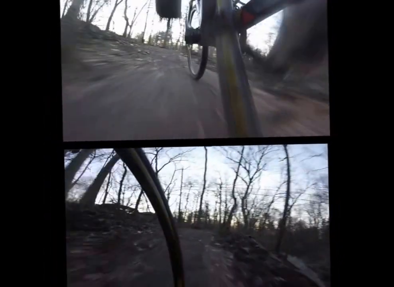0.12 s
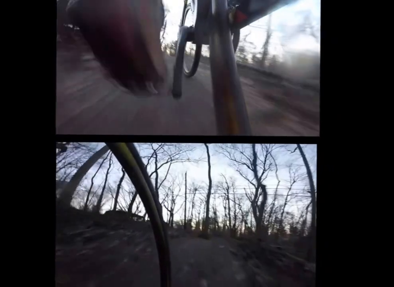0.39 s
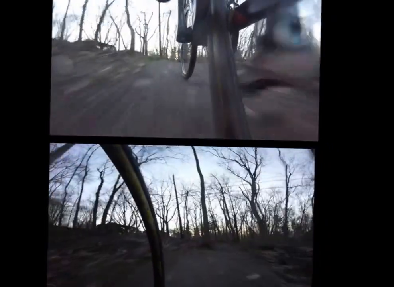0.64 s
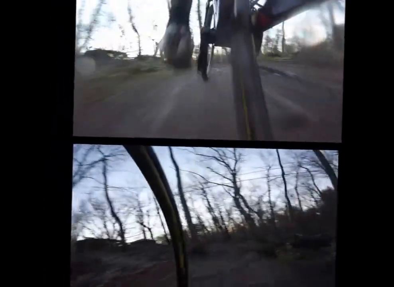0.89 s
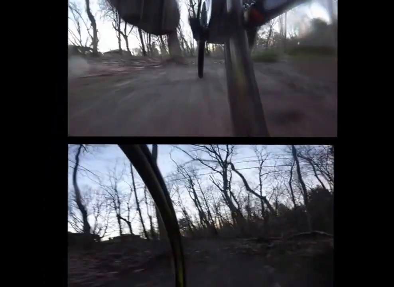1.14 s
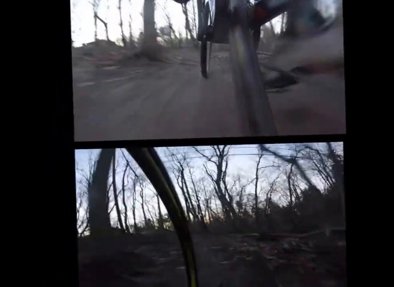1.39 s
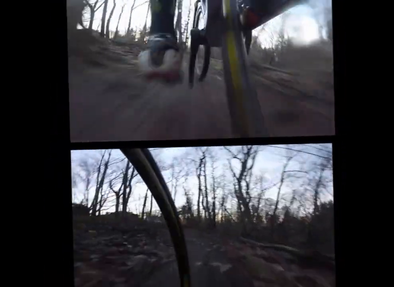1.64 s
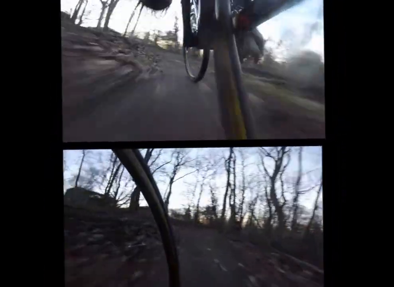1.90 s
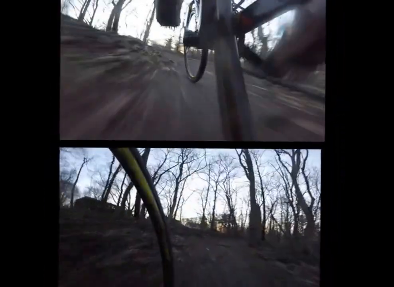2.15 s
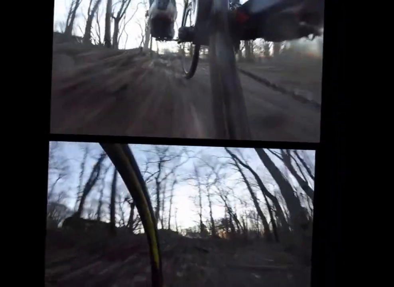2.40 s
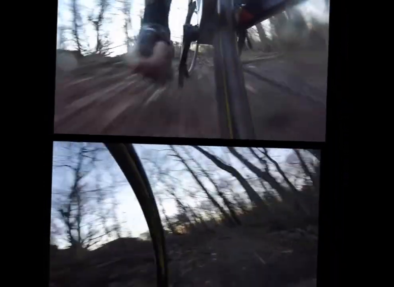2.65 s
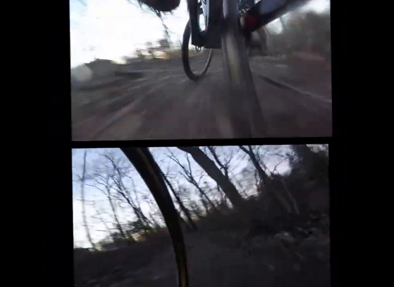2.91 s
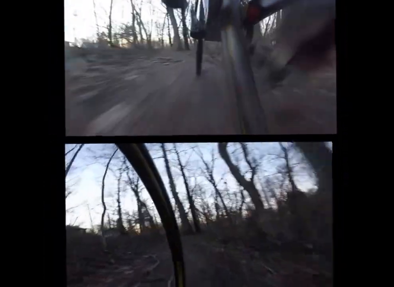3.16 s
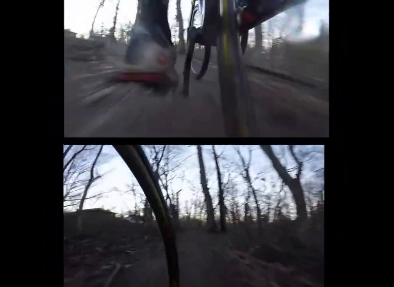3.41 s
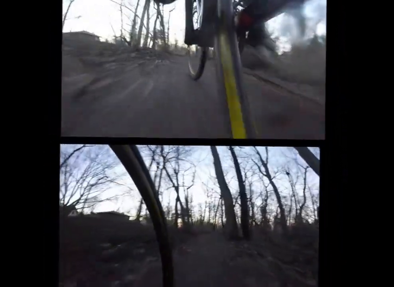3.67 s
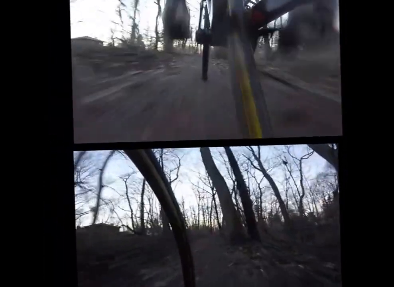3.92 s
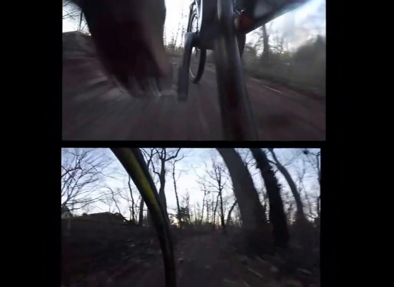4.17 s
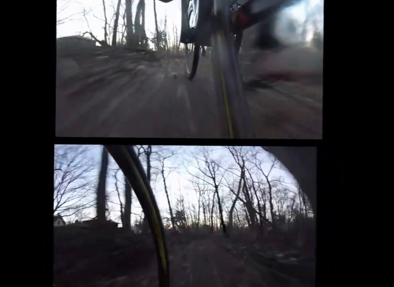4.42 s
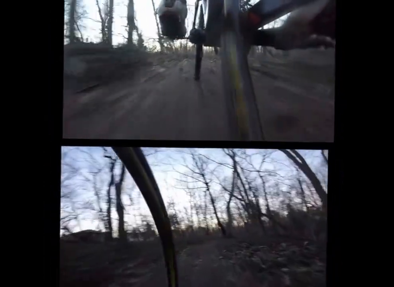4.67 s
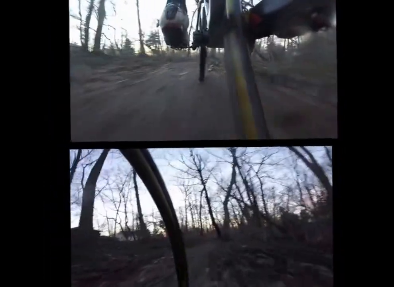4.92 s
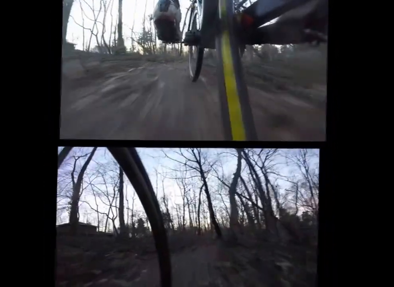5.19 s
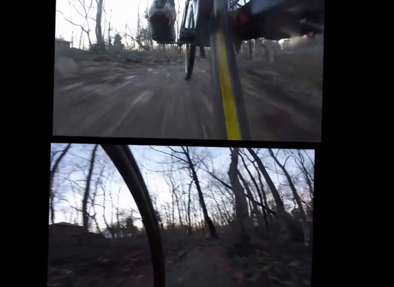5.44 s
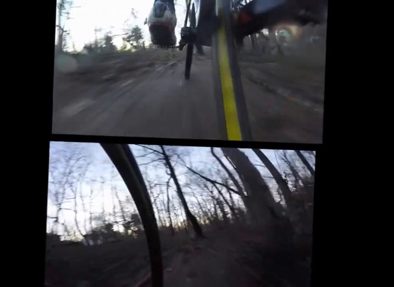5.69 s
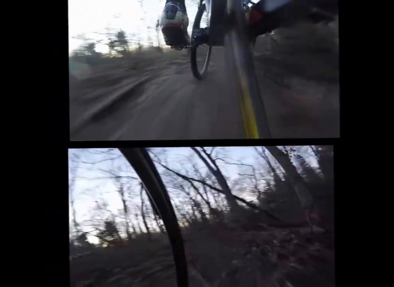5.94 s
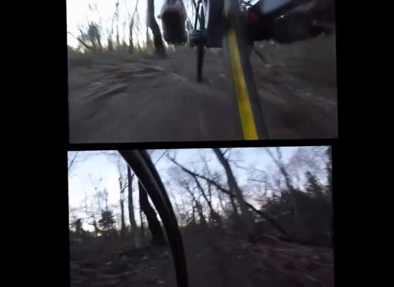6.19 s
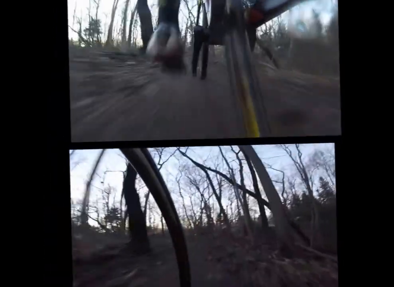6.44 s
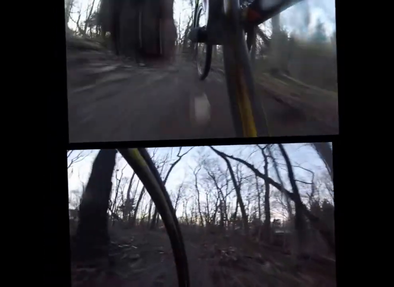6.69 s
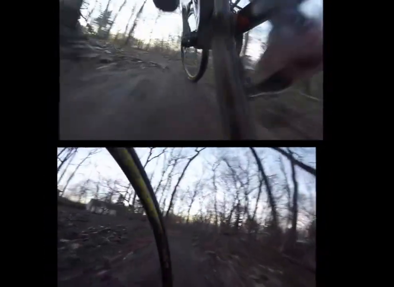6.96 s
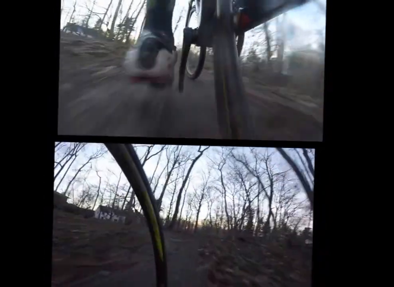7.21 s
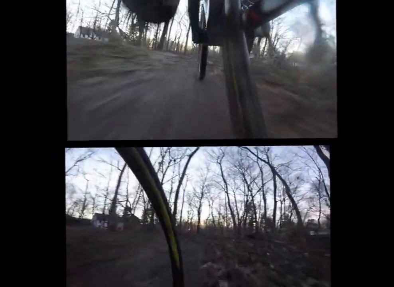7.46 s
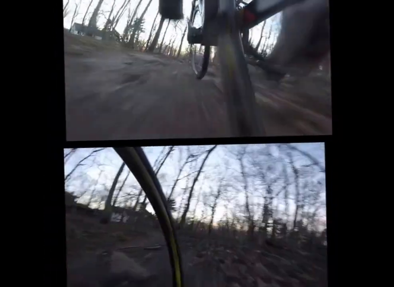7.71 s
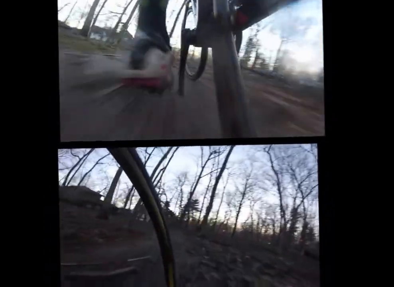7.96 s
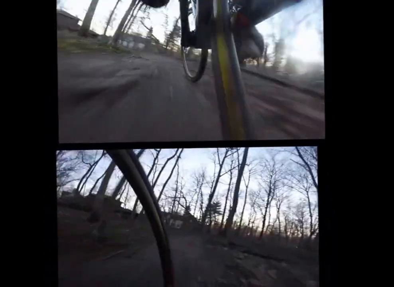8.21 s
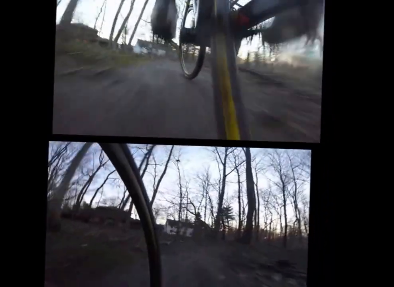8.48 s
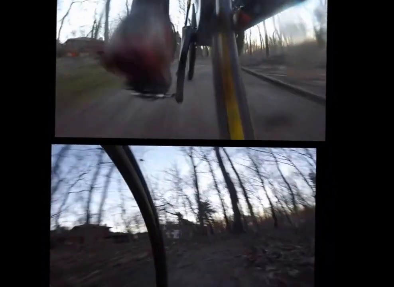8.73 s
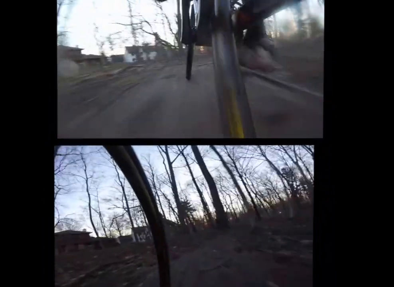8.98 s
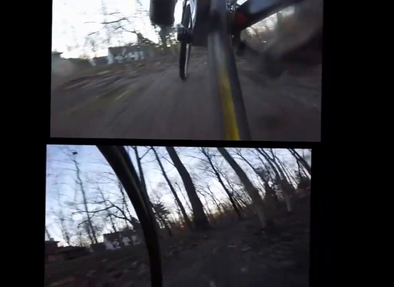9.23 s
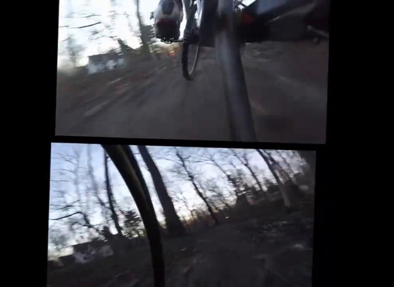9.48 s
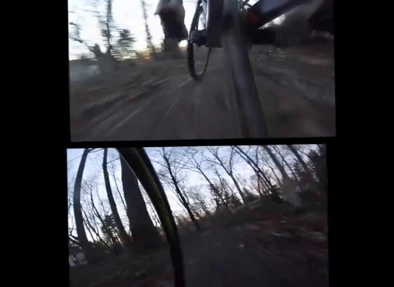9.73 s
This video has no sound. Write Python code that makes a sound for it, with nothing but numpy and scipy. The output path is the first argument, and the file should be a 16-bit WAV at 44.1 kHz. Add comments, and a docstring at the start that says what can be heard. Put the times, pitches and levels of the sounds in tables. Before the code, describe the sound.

A bicycle rides quickly on a woodland dirt trail, heard from a small cased microphone on the frame. Throughout, bass wind buffeting swells and drops, the frame rumbles in irregular jolts, and dirt crunches under the tyres. From 0 to 2.1 s a light gritty chain whirr accompanies knocks, with a bump at the start and a click at 1.8. The freewheel buzzes briefly from 2.1 to 2.5; a cluster of snaps follows, with a strong crack at 2.84 as pedalling resumes. Jolts thud around 3.2-3.6. From 4.5 to 6.3 it coasts with rapid metallic ticking, a barely audible brake squeak near 5.5, snaps around 5.9 and a click at 6.06. The sharpest crack and stone pings come at 6.38. Faint chain noise returns until 9.17, with dense knocks around 7.3-7.9. A heavy jolt at 9.2 begins the final coast, its ticking mixed with crackling snaps and bumps until about 9.9.

```python
"""Bicycle on a woodland trail

Heard from a small camera in a case clamped to the frame: buffeting air and ground jolts fill the bass.
Coloured noise makes the air, and showers of tiny impacts make the frame rumble and tyre crunch.
The chain is gated impact noise, one swell per link; the freewheel is a run of ticks ringing hub modes.
Noise bursts make snaps, knocks and pops; decaying sines make pings; one wavering tone is a brake squeak."""
import sys
import numpy as np
from scipy import signal
from scipy.fft import rfft, irfft
from scipy.io import wavfile
from scipy.ndimage import uniform_filter1d

SR = 44100
rng = np.random.default_rng(int(sys.argv[2]) if len(sys.argv) > 2 else 0)


def invert_db(level):
    """Linear amplitude ratio for a level in decibels (20 dB per decade), elementwise."""
    return 10 ** (np.asarray(level, dtype=float) / 20)


def transcribe(u):
    """Save the signal u as a 16-bit wav file named by the first command-line argument.

    u: samples, shape (n,) or (channels, n), limited to [-1, 1]; the rate is SR.
    q: integer samples, one column per channel.
    """
    v = np.clip(np.atleast_2d(u).T, -1, 1)
    q = np.round(v * 32767).astype(np.int16)
    wavfile.write(sys.argv[1], SR, q)


N = 434826
T = np.arange(N) / SR

# The ride as it unfolds, rumble and crunch being those between bumps:
# t/s, buffeting level/dB, frame rumble level/dB, tyre crunch level/dB
RIDE_LEVELS = [(0.0, -33, -30, -34.5), (0.22, -18.5, -20.5, -31), (0.24, -26, -23, -32.5),
               (0.44, -24.5, -28.5, -38), (0.52, -33.5, -27, -30), (0.6, -27.5, -27, -42),
               (0.69, -30.5, -28.5, -33), (1.18, -25.5, -27, -35.5), (1.56, -28.5, -23.5, -31),
               (1.64, -20, -23, -32.5), (2.06, -29, -22.5, -31), (2.22, -25.5, -26.5, -34.5),
               (2.47, -25, -28, -35.5), (2.94, -24.5, -21.5, -35.5), (3.07, -37, -28, -39.5),
               (3.35, -27.5, -23.5, -33.5), (3.79, -27, -25.5, -33), (4.06, -24.5, -25, -32.5),
               (4.34, -33, -27, -35.5), (5.11, -24.5, -26, -34), (5.16, -36, -25.5, -34),
               (5.32, -21.5, -37, -40.5), (5.43, -26.5, -27, -36), (6.12, -25.5, -25, -36.5),
               (6.34, -33, -26.5, -35), (6.76, -33, -28.5, -37), (7.69, -26.5, -21, -32),
               (7.8, -21.5, -27, -33), (7.96, -29.5, -26.5, -36.5), (8.02, -22, -27.5, -36.5),
               (8.32, -37.5, -27, -35.5), (8.81, -22, -26.5, -33), (8.87, -28.5, -24.5, -36),
               (9.42, -21, -23.5, -32), (9.83, -24, -34.5, -37.5), (9.86, -32, -24, -38)]
# Bumps in the trail that shake the frame: start t/s, length/s, rumble level/dB
TRAIL_BUMPS = [(0.162, 0.091, -22), (0.283, 0.036, -22), (0.343, 0.019, -29), (0.418, 0.031, -22),
               (0.547, 0.075, -21.5), (1.062, 0.054, -23), (1.574, 0.2, -24), (2.12, .06, -20),
               (2.194, 0.031, -19.5), (2.72, 0.094, -24.5), (2.89, 0.087, -31), (3.195, 0.13, -19),
               (3.447, 0.038, -18), (3.546, 0.06, -21.5), (3.904, 0.068, -23.5), (4.569, 0.1, -24),
               (4.924, 0.08, -23), (5.282, 0.071, -19), (6.031, 0.032, -20), (6.1, 0.064, -18),
               (6.43, 0.095, -24.5), (7.576, 0.15, -22.5), (7.756, 0.066, -18.5), (8.007, 0.039, -19),
               (8.105, 0.026, -18), (8.763, 0.1, -19.5), (8.993, 0.058, -20), (9.217, 0.021, -13.5),
               (9.377, 0.197, -20.5), (9.616, 0.029, -23.5), (9.733, 0.099, -22.5)]
# Spectrum of the buffeting air: f/Hz, level/dB per Hz
AIR_COLOUR = [(12, -21), (24, -5), (38, 2), (50, 0), (75, -5), (110, -11.5), (250, -47)]
# Spectrum of the shaken frame: f/Hz, level/dB per Hz
FRAME_COLOUR = [(30, -21.5), (70, -1.5), (125, 0), (190, 1), (290, -2.5), (400, -9.5), (600, -16.5),
                (1200, -49.5)]
# Spectrum of dirt under the tyres: f/Hz, level/dB per Hz
TYRE_COLOUR = [(200, -20), (400, 0), (560, -5), (680, -5), (850, -13), (1080, -17), (1340, -27),
               (1900, -33), (2600, -34), (3800, -46), (6000, -58), (9000, -62)]
# Hairline clicks through the mount: t/s, relative level/dB, tilt from bass to treble/dB
MOUNT_POPS = [(0.435, -32, 11), (0.556, -28, 5), (1.821, -12.5, -7), (3.9146, -13.5, -9),
              (4.1522, -12.5, -7), (4.191, -35, 6), (4.818, -22, 28), (6.057, -7.5, -1), (7.435, -28, -9),
              (8.932, -13, -5), (9.001, -18, -6), (9.021, -20.5, -7), (9.251, -19, -12)]
# Overall colour of those clicks: f/Hz, gain/dB
POP_COLOUR = [(300, -1.5), (8000, -4.5), (9500, -11.5), (10500, -25), (12500, -36), (20000, -73.5)]
# Small stones off spokes and tubes: t/s, relative level/dB, nominal f/Hz, t60/s
STONE_PINGS = [(0.6454, -24, 4180, 0.016), (1.152, -34, 6500, .03), (2.636, -31.5, 4400, 0.023),
               (2.7985, -34, 4260, 0.018), (3.5495, -26, 3340, 0.035), (4.069, -33.5, 4560, 0.033),
               (4.2672, -33, 4100, 0.022), (4.2837, -39, 4370, 0.036), (4.754, -31, 5500, 0.033),
               (6.255, -26, 1780, 0.014), (6.333, -42, 4900, 0.0087), (6.374, -22.5, 3230, 0.023),
               (6.425, -40, 7960, .02), (6.494, -48, 7900, .025), (6.626, -38, 5040, .02),
               (6.835, -35, 4700, 0.014), (7.758, -33, 4500, 0.023), (7.769, -27, 4320, .025),
               (7.877, -35, 3880, 0.062), (8.8423, -26, 4800, 0.011)]
# Brake squeak, before its waver: t/s, f/Hz, level/dB
SQUEAK_PATH = [(5.418, 632, -72), (5.434, 640, -53), (5.486, 661, -49), (5.518, 666, -54), (5.55, 669, -61),
               (5.62, 669, -68)]
# Partials of the squeak: multiple of the pitch, level/dB
SQUEAK_PARTIALS = [(1, 3), (2, 3), (4, -12)]
# Grit and twigs on the case, slack taken up in the drive:
# t/s, relative level/dB, share of metal ring (0-1), decay time of the dry tail/ms
SNAP_EVENTS = [(1.155, -29, 0.24, 4), (2.636, -27, 0.2, 3), (2.658, -37, 0.2, 3), (1.808, -23, 0.3, 1.5),
               (2.517, -27, 0.1, 2.7), (2.54, -20, 0.15, 3), (2.554, -22.5, 0.44, 4.4),
               (2.5866, -36, 0.3, 2.7), (2.604, -22, 0, 5.1), (2.616, -21, 0.1, 4), (2.836, -14, 0, 2.1),
               (2.84, -6, 0.01, 1.1), (2.843, -8, 0.03, 0.72), (3.175, -28, 0.26, 2.3),
               (3.547, -12.5, 0.08, 4.1), (4.145, -27, 0, 1.6), (4.818, -21, 0, 1.4),
               (5.848, -18, 0.05, 1.6), (5.864, -17.5, 0, 1.8), (5.8997, -18.5, 0, 2.7),
               (5.935, -17.5, 0, 2.2), (6.139, -19, 0.07, 3.1), (6.221, -19, 0.4, 3.7),
               (6.253, -22, 0.1, 1.7), (6.357, -33, 0.3, 3), (6.364, -29, 0.7, 4), (6.373, -23, 0.5, 5.8),
               (6.3833, -1.5, 0.34, 1.2), (6.384, -8, 0.3, 4.5), (6.425, -33, 0.15, 2.6),
               (6.464, -35, 0.2, 3), (7.752, -27, 0.4, 5), (7.876, -33, 0.1, 4), (8.312, -25, 0.04, 0.76),
               (8.489, -24, 0.25, 2.4), (8.93, -18, 0, 1.7), (9.458, -21, 0.02, 2.7),
               (9.474, -19.5, 0.1, 3), (9.499, -24, 0, 3), (9.512, -20, 0.1, 3.6), (9.538, -19, 0.1, 3),
               (9.552, -21, 0, 3.5), (9.579, -18.5, 0.02, 3.4), (9.722, -22, 0, 4)]
# Ringing modes of the drive train: f/Hz, level/dB, t60/s
DRIVE_MODES = [(2375, 0, .03), (2600, -4, .012), (2850, -3, .036), (3250, -6, .012), (4300, -8, .01)]
# Roots and stones under the wheels: t/s, relative level/dB, brightness of the upper modes/dB
WHEEL_KNOCKS = [(0.099, -27, -13), (0.276, -23, -25), (0.36, -13, -12), (0.598, -26, -23),
                (1.054, -20, -24), (1.129, -20, -12), (1.189, -21, -27), (1.634, -22, -20),
                (1.785, -22, -19), (2.184, -28, -20), (2.513, -29, -14), (2.553, -16.5, -17),
                (2.899, -26, -21), (3.263, -17.5, -20), (3.289, -23, -22), (3.443, -27, -18),
                (3.546, -18.5, 1), (3.552, -21, -18), (3.615, -20, -23), (3.836, -23, -16),
                (3.967, -17, -13), (4.132, -20, -12), (4.188, -18, -23), (4.609, -24, -22),
                (4.948, -27, -26), (5.312, -20, -4), (5.685, -28, -12), (6.037, -19, -18), (6.054, -24, -8),
                (6.115, -15.5, -19), (6.303, -23, -16), (6.382, -16, -10), (6.445, -22, -16),
                (6.457, -19, -17), (6.467, -20, -19), (6.905, -28, -27), (6.994, -28, -23),
                (7.319, -23, -23), (7.411, -23, -21), (7.471, -21.5, -23), (7.604, -14, -14),
                (7.641, -20.5, -22), (7.698, -20, -18), (7.795, -19, -22), (7.851, -26.5, -23),
                (8.124, -26, -19.5), (8.743, -20, -19), (9.0, -25, -15), (9.176, -25, -21),
                (9.246, -24, -11), (9.302, -27, -20), (9.364, -19, -20), (9.405, -21, -23),
                (9.451, -25, -21), (9.778, -22, -17)]
# Ringing modes of the mount: f/Hz, level/dB, t60/s
MOUNT_MODES = [(298, 0.5, 0.012), (447, 3, 0.011), (600, 3, 0.01), (760, 1, .01), (930, 0, 0.009),
               (1120, 0, 0.009), (1400, -3, 0.008), (1690, -9, 0.006)]
# Pedalling spells, one list each: t/s, chain level/dB
PEDAL_SPELLS = [
    [(0.0, -36), (0.46, -41.5), (1.07, -42.5), (1.34, -39.5), (2.09, -41)],
    [(2.5, -33), (2.66, -36), (2.852, -45.5), (3.19, -43), (3.87, -40), (4.352, -43), (4.53, -45)],
    [(6.4, -56), (6.67, -46.5), (6.84, -44), (7.38, -44), (7.69, -40), (8.45, -37.5), (8.74, -43.5),
     (8.99, -40), (9.17, -48.5)],
]
# Nominal rate of links seating, one value per pedalling spell: links/s
LINK_RATES = (53.5, 51.5, 50.5)
# Spectrum of the links in three bands that flicker apart: f/Hz, level/dB per Hz
LINK_BANDS = [
    [(800, 2.5), (2000, -1), (2480, 0), (2640, 7), (2800, 0), (3600, -0.5), (4400, -25)],
    [(2800, -29), (3800, -4), (5000, 1.5), (6200, 1), (7200, -27)],
    [(5400, -34), (6600, -1.5), (9000, -3.5)],
]
# Coasting spells, how far the wheel has overrun the cranks: t/s, ratchet teeth passed
COAST_SPELLS = [
    [(2.0949, 0), (2.1271, 1), (2.1814, 3), (2.2402, 6), (2.3707, 14), (2.4073, 16), (2.4322, 17),
     (2.4641, 18)],
    [(4.5394, 0), (4.6073, 3), (4.6775, 7), (4.7677, 12), (4.8481, 16), (4.9159, 20), (5.026, 27),
     (5.0842, 31), (5.1814, 37), (5.2342, 40), (5.3126, 44), (5.3966, 48), (5.4715, 52), (5.6085, 59),
     (5.6846, 63), (5.7686, 68), (5.8636, 74), (6.01, 82), (6.0844, 86), (6.1532, 90), (6.2035, 93),
     (6.2682, 97), (6.2907, 98), (6.3217, 99)],
    [(9.1743, 0), (9.2075, 1), (9.2355, 2), (9.3019, 5), (9.4105, 11), (9.4743, 15), (9.5115, 18),
     (9.5781, 23), (9.6605, 27), (9.7217, 29), (9.7433, 30), (9.8163, 33), (9.8512, 35)],
]
# Ratchet level through each coasting spell: t/s, relative level/dB at 55 teeth a second
RATCHET_LEVELS = [
    [(2.09, -54), (2.2, -52), (2.35, -51.5), (2.47, -52.5)],
    [(4.53, -57), (4.62, -56), (5.0, -54), (5.2, -52.5), (5.6, -50.5), (5.95, -54), (6.15, -47.5),
     (6.33, -53.5)],
    [(9.17, -56), (9.35, -52), (9.52, -49), (9.62, -54.5), (9.78, -56.5), (9.86, -54.5)],
]
# Ringing modes of the hub: f/Hz, level/dB, t60/s
HUB_MODES = [(2714, -8, 0.016), (2845, -7, 0.035), (3305, -10, 0.014), (3455, -2.5, 0.032),
             (3560, -5, 0.024), (4000, -11, 0.018), (4540, -9, 0.022), (4700, -15, 0.012), (6510, -5, 0.02),
             (7480, -7, 0.016), (8140, -7, 0.012), (10100, -9, .02), (10600, -5, .02), (11800, -1, .018)]
# Dry ratchet tick in three bands that vary apart: f/Hz, gain/dB
TICK_BANDS = [
    [(700, -36), (1500, -22.5), (2050, -19), (2450, -4), (3300, 0), (4200, -12)],
    [(2800, -28.5), (3800, 6), (4600, 0.5), (5300, -0.5), (6000, -3.5), (7200, -21)],
    [(5000, -32.5), (6400, 7), (8200, 6.5), (9300, 8), (10000, 1.5), (12000, -13.5)],
]
# Cavity of the case: f/Hz, gain/dB
CASE_COLOUR = [(300, 2.5), (3800, -6.5), (4600, -2.5), (5300, 5), (5750, -5.5), (6200, -14), (7200, -13.5),
               (8200, -8.5), (8700, -14.5), (9200, -26.5), (9900, -35.5), (10800, -39.5), (11800, -40),
               (12800, -57), (20000, -72.5)]


def colour(x, points):
    """Causal minimum-phase filter through (Hz, dB) points, from the cepstrum of the log gain."""
    hz, db = np.transpose(points)
    size = 2 ** 14
    bins_hz = np.arange(size // 2 + 1) * SR / size
    gain_db = np.interp(np.log(bins_hz + 1), np.log(hz), db)
    cepstrum = irfft(np.log(invert_db(gain_db)))
    # fold the cepstrum forward in time
    cepstrum[1:size // 2] *= 2
    cepstrum[size // 2 + 1:] = 0
    response = irfft(np.exp(rfft(cepstrum)))[:size // 2]
    return signal.fftconvolve(x, response)[:N]


def unit(x):
    """Scale to rms 1."""
    return x / np.sqrt(np.mean(x ** 2))


def walk(rate):
    """Random levels held 1 / rate s and slewed twice; spread near 1."""
    hold = int(SR / rate)
    steps = np.repeat(rng.standard_normal(N // hold + 1), hold)
    return 1.25 * uniform_filter1d(uniform_filter1d(steps, hold), hold)[:N]


def contacts(per_s, spread_db):
    """Scattered tiny impacts of either sign; a few are much stronger."""
    chance = rng.random((3, N))
    hit = chance[0] < per_s / SR
    sign = np.sign(chance[1] - .5)
    return hit * sign * invert_db(-spread_db * np.log(1 - chance[2]))


def bursts(times, gains, tails_ms, edge):
    """Each blow is one sharp edge and a dying chatter of noise."""
    out, t_ms = np.zeros(N + 2048), np.arange(2048) / SR * 1000
    for s, gain, tail_ms in zip(times, gains, tails_ms):
        i = min(int(s * SR), N)
        out[i] += gain * edge
        decay = np.exp(-t_ms / max(tail_ms, .1))
        out[i:i + len(t_ms)] += gain * decay * rng.standard_normal(len(t_ms))
    return out[:N]


def ring(x, modes):
    """Damped modes struck by x; their summed response has unit energy."""
    t = T[:4096]
    response = sum(invert_db(db) * np.sin(2 * np.pi * hz * t) * np.exp(-np.log(1000) * t / t60)
                   for hz, db, t60 in modes)
    return signal.fftconvolve(x, response / np.sqrt(np.sum(response ** 2)))[:N]


def buffeting(air_db, bump):
    """Air buffets the port in quick swells, and each bump adds a push of lows."""
    gust_db, bump_bass_db = 1.5, -10.5  # swell spread; lows against the bump's rumble
    air = unit(colour(rng.standard_normal(N), AIR_COLOUR))
    return air * np.hypot(invert_db(air_db + gust_db * walk(12)), bump * invert_db(bump_bass_db))


def frame_rumble(frame_db, bump, rough):
    """Jolts shake the frame: a shower of impacts through its low resonances."""
    jolts = contacts(1500, 1.83) * invert_db(0.77 * rough + 0.83 * walk(60))
    return unit(colour(jolts, FRAME_COLOUR)) * np.hypot(invert_db(frame_db), bump)


def tyre_crunch(tyre_db, bump, rough):
    """Dirt crunches under the tyres: a denser shower of impacts, louder on bumps."""
    bump_crunch_db = -17  # crunch against the bump's rumble
    dirt = contacts(6000, 1.78) * invert_db(1.85 * walk(50) + 0.2 * rough)
    return unit(colour(dirt, TYRE_COLOUR)) * np.hypot(invert_db(tyre_db), bump * invert_db(bump_crunch_db))


def ground():
    """Air, frame and tyres share the bumps; frame and tyres share the trail's roughness and swell."""
    bump_edge_s, trail_db = 0.014, 1.2  # rise and fall of a bump; spread of the trail's swell
    s, *columns = np.transpose(RIDE_LEVELS)
    air_db, frame_db, tyre_db = (np.interp(T, s, column) for column in columns)
    bump = sum(invert_db(db) * np.clip(np.minimum(T - start, start + length - T) / bump_edge_s + .5, 0, 1)
               for start, length, db in TRAIL_BUMPS)
    rough, swell_db = walk(22), trail_db * walk(9)
    return (buffeting(air_db, bump) + frame_rumble(frame_db + swell_db, bump, rough)
            + tyre_crunch(tyre_db + swell_db, bump, rough))


def pops():
    """Very short clicks through the mount, each leaning to bass or treble."""
    s, db, tilt_db = np.transpose(MOUNT_POPS)
    dull = uniform_filter1d(bursts(s, invert_db(db - tilt_db / 2), 0 * s, 7.7), size=6)
    thin = signal.lfilter([1, -1], [1, -.5], bursts(s, invert_db(db + tilt_db / 2), 0 * s, 9.0))
    return colour(invert_db(-8.5) * dull + invert_db(-18) * thin, POP_COLOUR)


def pings():
    """A stone strikes metal: one rough note that sags as it dies."""
    sag, roughness = 0.036, 1  # share by which pitch falls, centred on nominal; noise in the ring
    out, t = np.zeros(N), T[:2048]
    for s, db, hz, t60 in STONE_PINGS:
        rough = 1 + roughness * unit(uniform_filter1d(rng.standard_normal(len(t)), size=40))
        pitch = hz * (1 + sag * (np.exp(-3 * t / t60) - .5))
        phase = 2 * np.pi * np.cumsum(pitch) / SR
        envelope = (1 - np.exp(-t / 0.0005)) * np.exp(-np.log(1000) * t / t60)
        i = int(s * SR)
        out[i:i + len(t)] += invert_db(db) * rough * np.sin(phase) * envelope
    return out


def squeak():
    """A pad grabs the rim for a moment and sings, wavering, with a few harmonics."""
    s, hz, db = np.transpose(SQUEAK_PATH)
    pitch = np.interp(T, s, hz) * (1 + 0.0067 * walk(97))
    phase = 2 * np.pi * np.cumsum(pitch) / SR
    tone = sum(invert_db(level_db) * np.sin(round(k) * phase) for k, level_db in SQUEAK_PARTIALS)
    return np.sqrt(2) * tone * invert_db(np.interp(T, s, db)) * (T > s[0]) * (T < s[-1])


def snaps():
    """Sharp cracks, dry on the case or ringing in the drive train, with faint ticks strewn at random."""
    count, floor_db, most_metal, tick_tail_ms = 10, -32, 0.16, 2.1  # the faint ticks
    ticks = [(T[-1] * a, floor_db + 6 * b, most_metal * c, tick_tail_ms)
             for a, b, c in rng.random((count, 3))]
    s, db, metal, tail_ms = np.transpose(list(SNAP_EVENTS) + ticks)
    metal = np.clip(metal, 0, 1)
    dry_gain = invert_db(db) * (1 - metal)
    chatter = colour(bursts(s, dry_gain, tail_ms, 7.7),
                     [(1000, -29), (3000, -9.0), (4400, 2.0), (5600, 5.5), (9000, -3.0), (12000, -14.0)])
    # the first touch is wide in pitch, and stronger the shorter the crack
    touch_gain = dry_gain / np.sqrt(np.maximum(tail_ms, .1))
    touch = colour(bursts(s, touch_gain, 0 * tail_ms, 5.9),
                   [(500, -25.5), (1500, -12.0), (4000, -8.5), (9000, -7.5)])
    strike = colour(bursts(s, invert_db(db) * metal, 0.5 * tail_ms, 6.6),
                    [(900, -23.5), (2050, -13.5), (2350, 1.5), (9000, 8.5)])
    return invert_db(-3.5) * chatter + invert_db(-8.0) * touch + ring(strike, DRIVE_MODES)


def knocks():
    """Loose, crunching blows run up the frame into the mount; hard stones wake its upper modes."""
    tail_ms, push_ms = 7.4, 0.22  # decay time; a soft contact pushes for longer
    upper_hz, uneven_db = 850, 1.5  # modes above follow brightness; spread of each mode's level
    s, db, bright_db = np.transpose(WHEEL_KNOCKS)
    tails, push = np.full(len(s), tail_ms), max(int(push_ms * SR / 1000), 1)
    low = uniform_filter1d(bursts(s, invert_db(db - 15.0), tails, 3.9), push)
    high = uniform_filter1d(bursts(s, invert_db(db + bright_db - 11.5), tails, 3.9), push)
    # each blow lands elsewhere and wakes the modes unevenly
    return sum(invert_db(mode_db + uneven_db * walk(25)) * ring(high if hz > upper_hz else low, [(hz, 0, t60)])
               for hz, mode_db, t60 in MOUNT_MODES)


def chain():
    """Links seat on the sprocket in turn, wide and narrow ones unlike, over a rub of grit."""
    flicker_db = 2
    mesh = np.zeros(N)
    for spell, rate in zip(PEDAL_SPELLS, LINK_RATES):
        s, db = np.transpose(spell)
        links = np.cumsum(rate * (1 + .05 * walk(3) + .05 * walk(30))) / SR
        alternate = invert_db(-3 * (links % 2 > 1))  # every other link is softer
        seat = np.sin(np.pi * (links % 1) ** .5) ** 4 * alternate
        on = np.clip(np.minimum(T - s[0], s[-1] - T) / 0.03 + 1, 0, 1)
        mesh += unit(seat + 0.49) * invert_db(np.interp(T, s, db)) * on  # the constant is the rub
    return sum(colour(unit(contacts(18000, 2.86)) * mesh * invert_db(flicker_db * walk(45)), band)
               for band in LINK_BANDS)


def freewheel():
    """Pawls drop off one tooth after another and ring the hub, then bounce and drag up the next ramp."""
    db_per_octave = -1  # faster teeth drop a little softer
    scatter_db, jitter_s, turn_db = .8, .0003, 1.8
    times, levels = [], []
    for spell, curve in zip(COAST_SPELLS, RATCHET_LEVELS):
        s, tooth = np.transpose(spell)
        tooth = np.round(tooth)
        at = np.interp(np.arange(tooth[-1] + 1), tooth, s)
        octaves = np.log2(1 / np.gradient(at) / 55)
        times += list(at)
        levels += list(np.interp(at, *np.transpose(curve)) + db_per_octave * octaves)
    count = len(times)
    chance = rng.standard_normal((count, 5)).T
    times = np.array(times) + jitter_s * chance[3]
    levels = np.array(levels) + scatter_db * chance[4]
    drop = bursts(times + .0008, invert_db(levels + chance[0]), np.full(count, 1.6), 2.2)
    bounce = bursts(times + .004 + 0.0015 * chance[1], invert_db(levels + 2.5 * chance[2] - 12.0),
                    np.full(count, 1.8), 1.5)
    drag = bursts(times, invert_db(levels - 8), np.full(count, 10.0), 0)
    blows = drop + bounce + drag
    # the hub turns, so each mode is struck now near a node, now near a loop, and each tick has its own colour
    hub = sum(invert_db(db) * ring(blows * invert_db(turn_db * walk(35)), [(hz, 0, t60)]) for hz, db, t60 in HUB_MODES)
    tick = sum(colour(blows * invert_db(turn_db * walk(40)), band) for band in TICK_BANDS)
    return invert_db(20.5) * (hub + invert_db(7) * tick)


def scene():
    """All but the pops sound through the case's cavity, which lifts the band near 5 kHz and dulls the top."""
    background = ground() + pings() + squeak()
    foreground = snaps() + knocks() + chain() + freewheel()
    return (colour(background + foreground, CASE_COLOUR) + pops())[None]


def top_cut(x):
    """Nothing passes above the cut-off."""
    return signal.sosfilt(signal.butter(12, 13800, fs=SR, output="sos"), x)


def record(dry):
    """Soft saturation rounds the peaks of the finished mix."""
    mix = np.tanh(0.81 * dry)
    return top_cut(mix)


dry = scene()
out = record(dry)
transcribe(out)
```